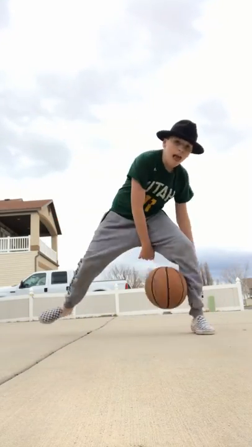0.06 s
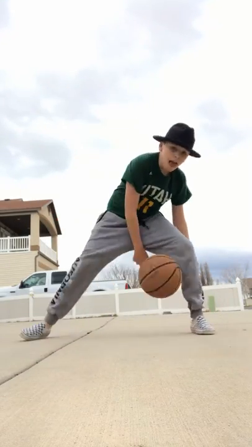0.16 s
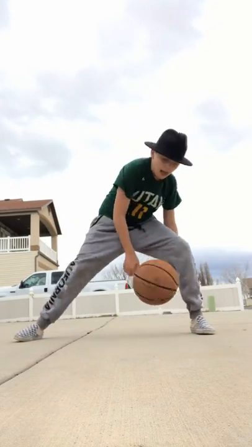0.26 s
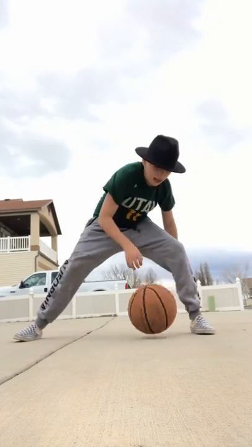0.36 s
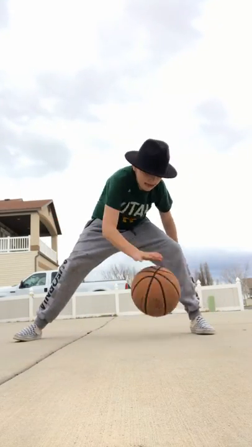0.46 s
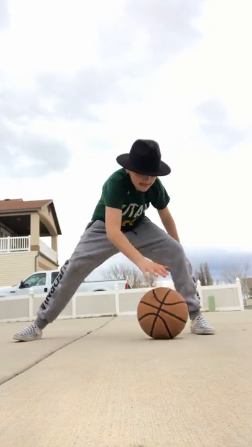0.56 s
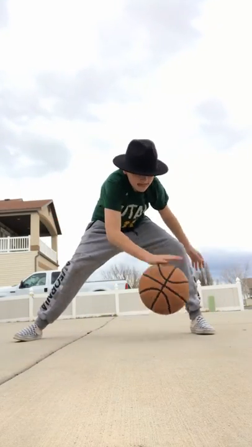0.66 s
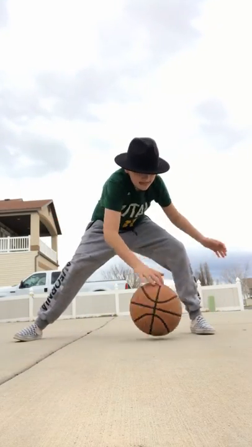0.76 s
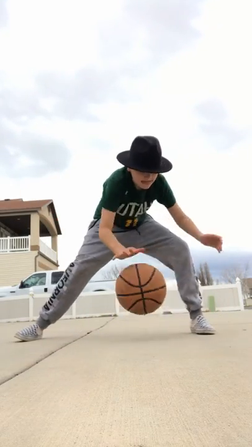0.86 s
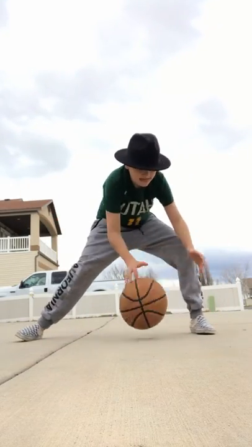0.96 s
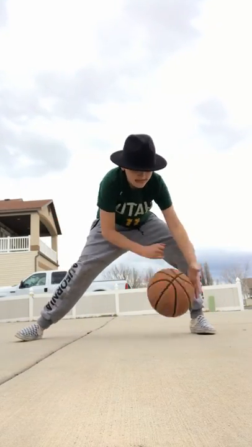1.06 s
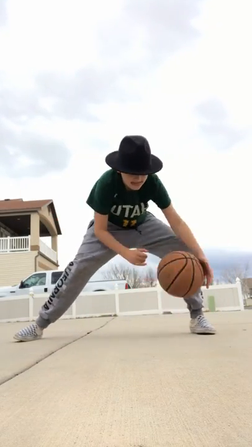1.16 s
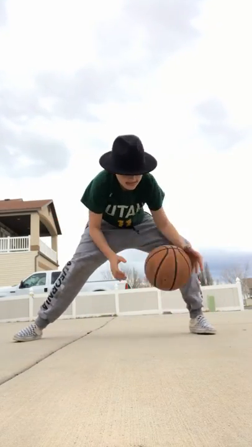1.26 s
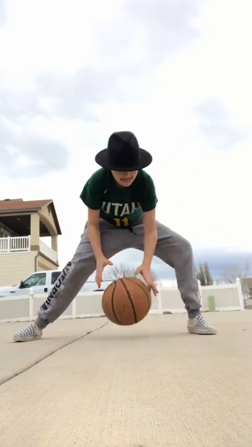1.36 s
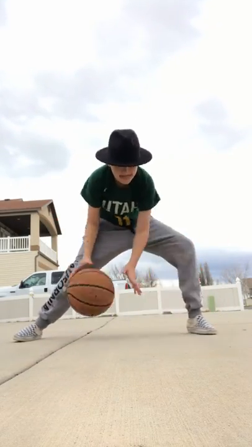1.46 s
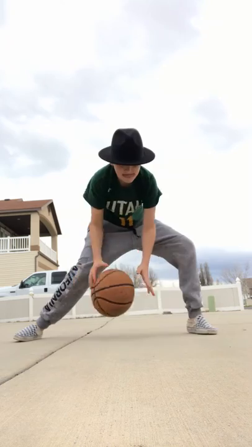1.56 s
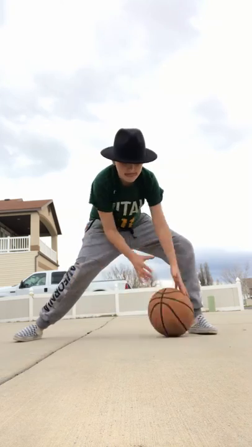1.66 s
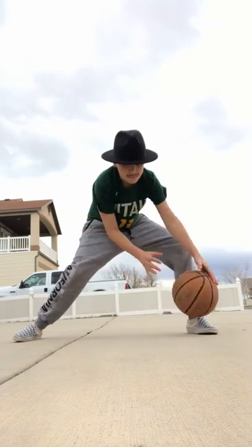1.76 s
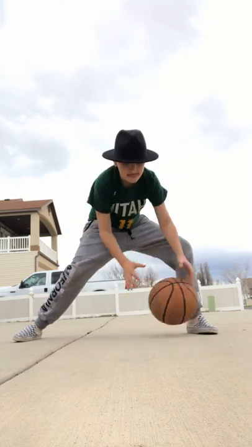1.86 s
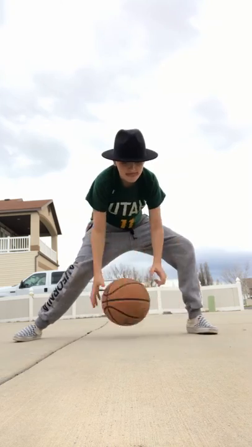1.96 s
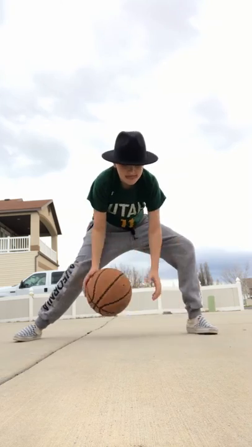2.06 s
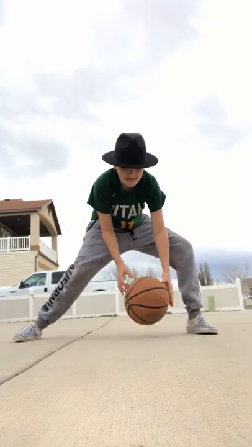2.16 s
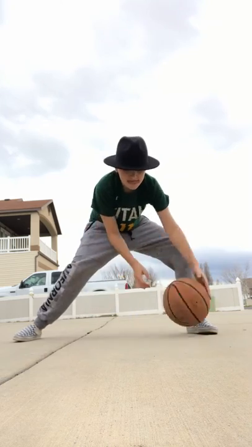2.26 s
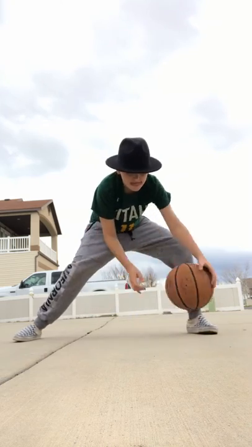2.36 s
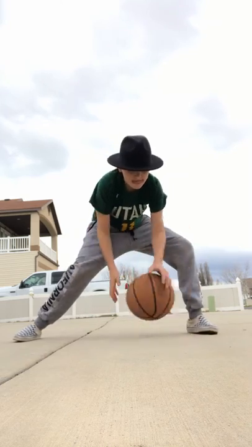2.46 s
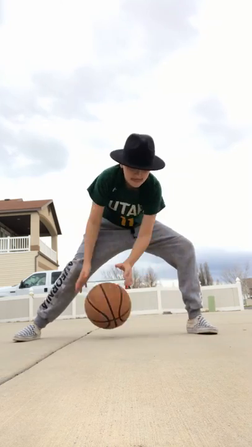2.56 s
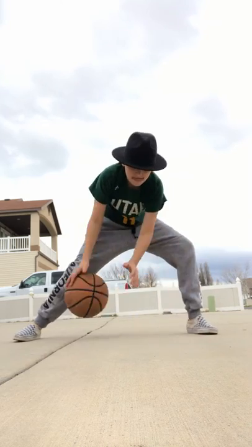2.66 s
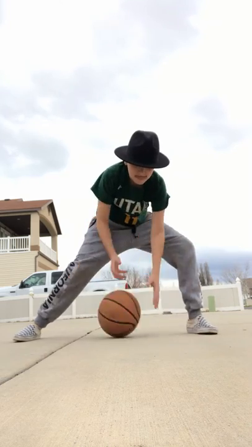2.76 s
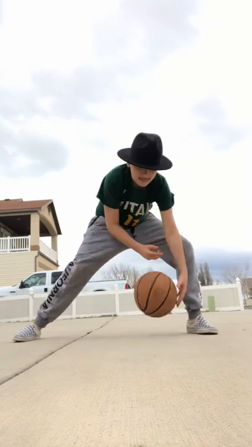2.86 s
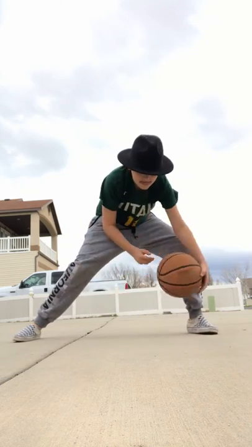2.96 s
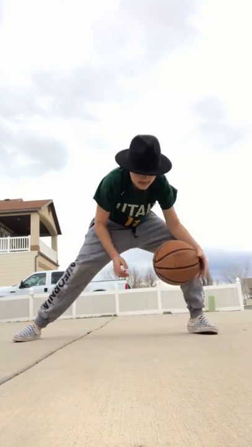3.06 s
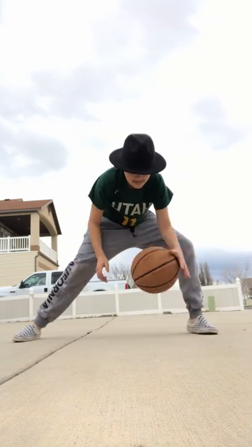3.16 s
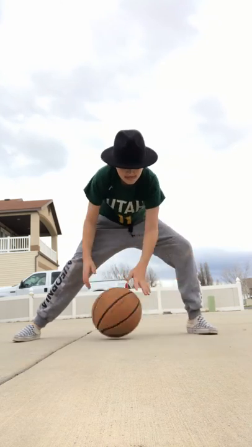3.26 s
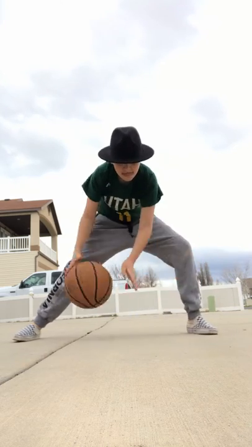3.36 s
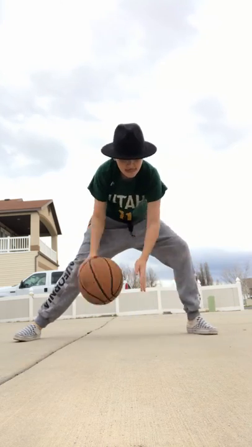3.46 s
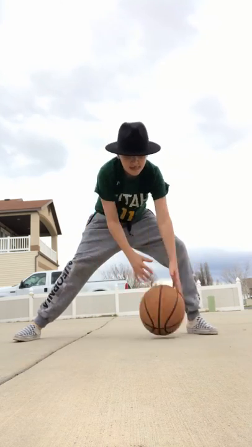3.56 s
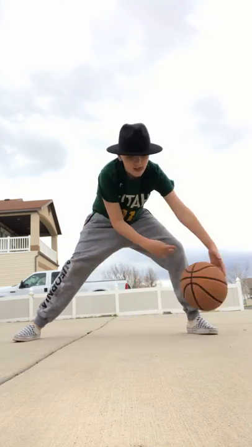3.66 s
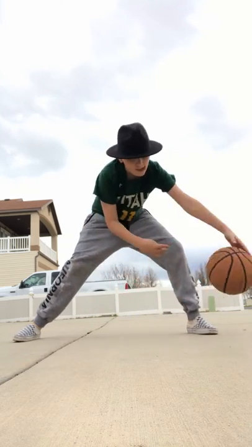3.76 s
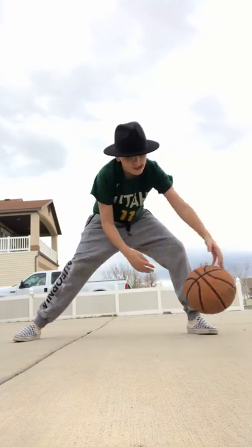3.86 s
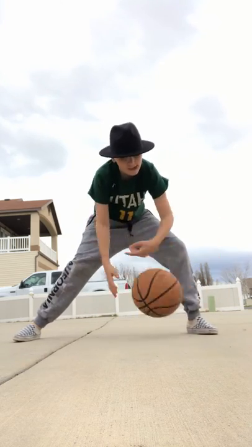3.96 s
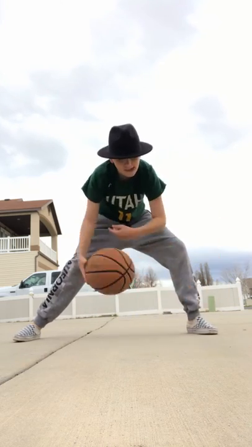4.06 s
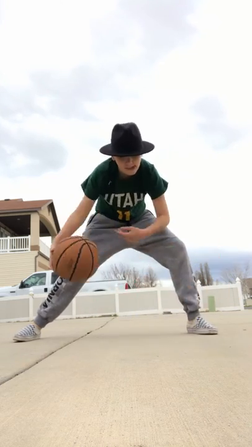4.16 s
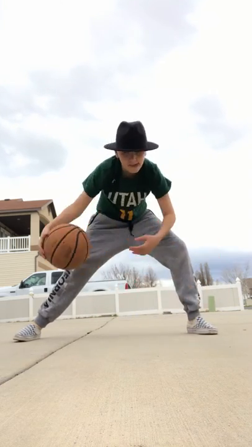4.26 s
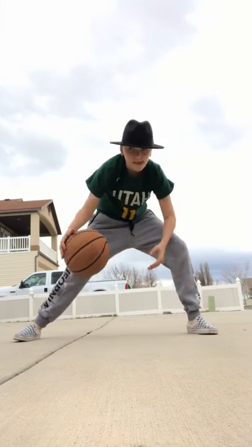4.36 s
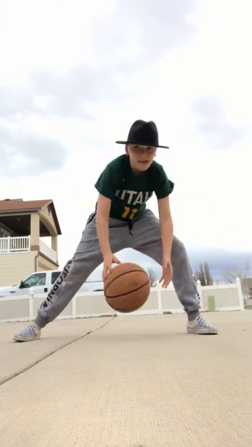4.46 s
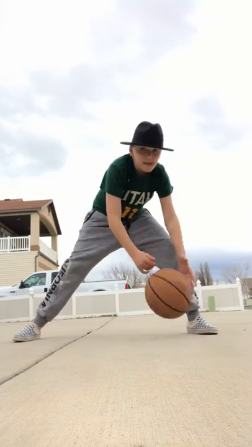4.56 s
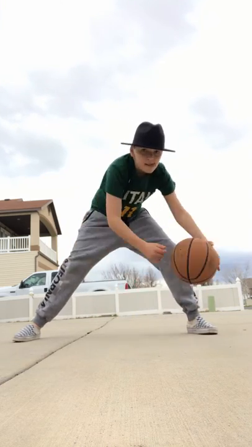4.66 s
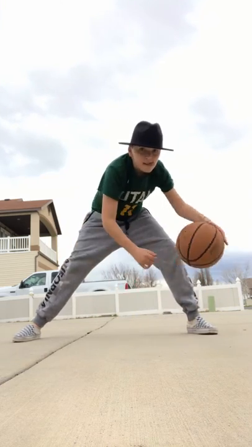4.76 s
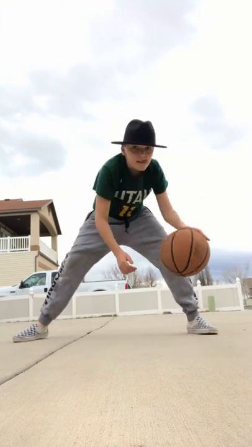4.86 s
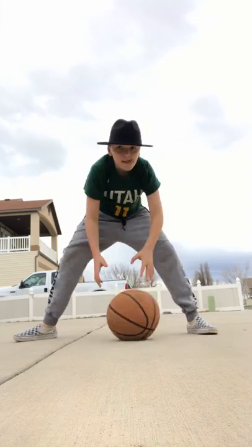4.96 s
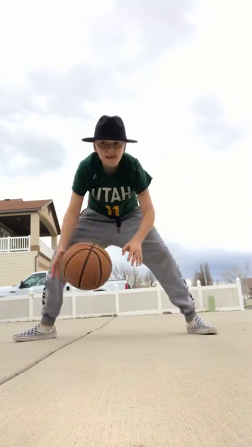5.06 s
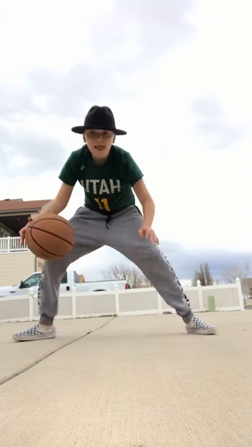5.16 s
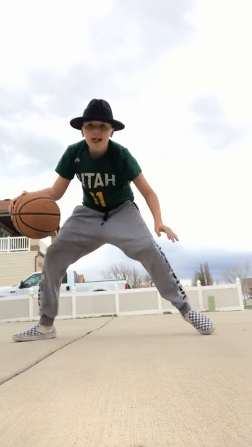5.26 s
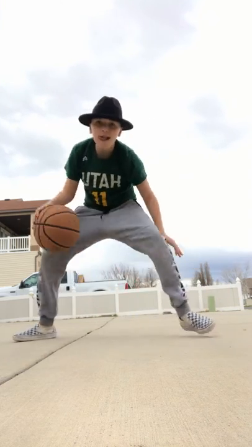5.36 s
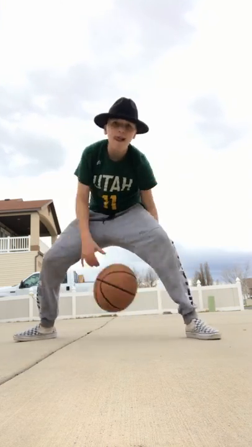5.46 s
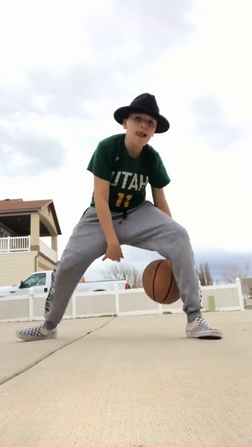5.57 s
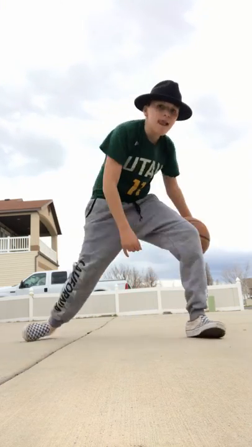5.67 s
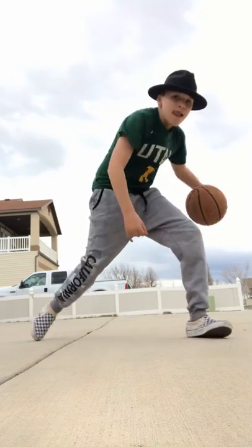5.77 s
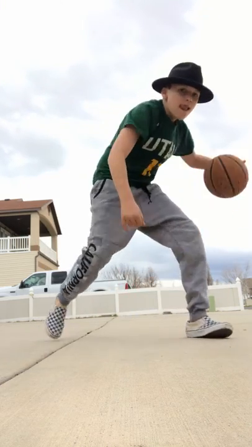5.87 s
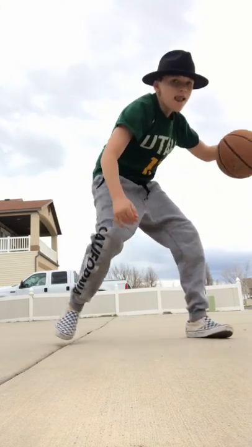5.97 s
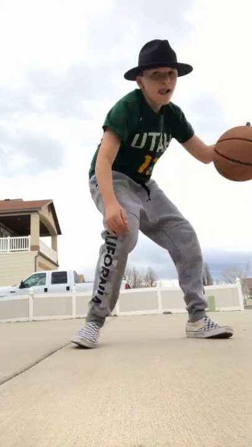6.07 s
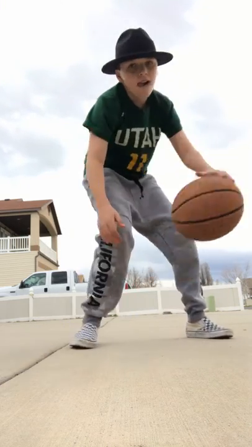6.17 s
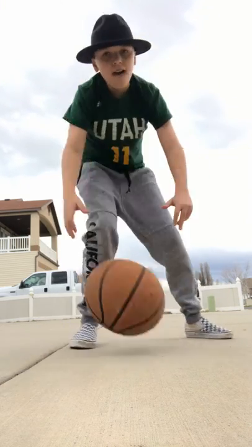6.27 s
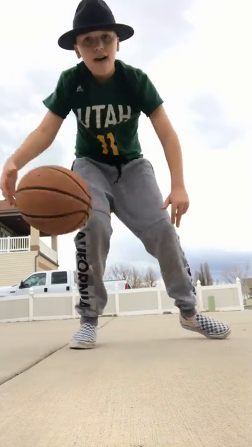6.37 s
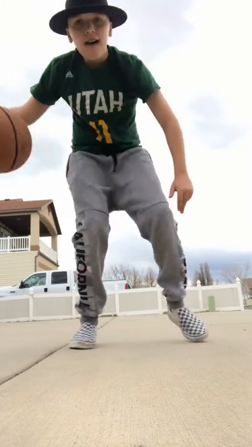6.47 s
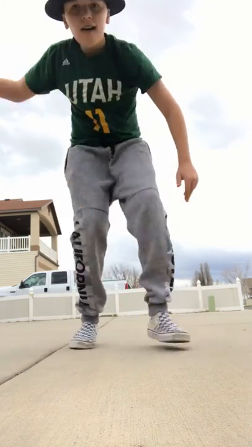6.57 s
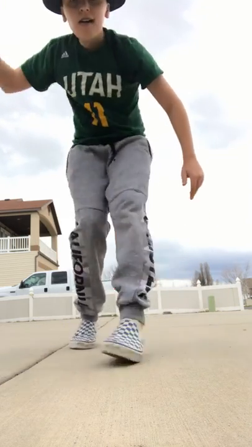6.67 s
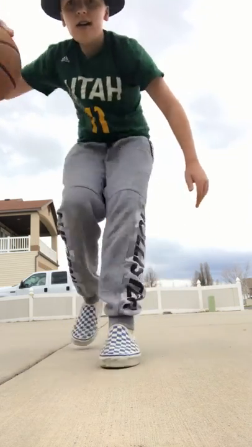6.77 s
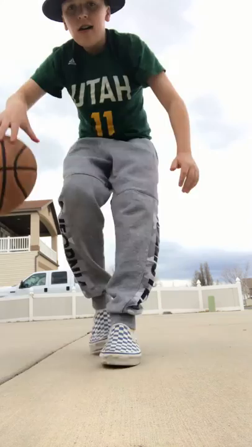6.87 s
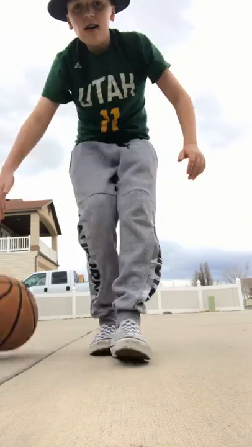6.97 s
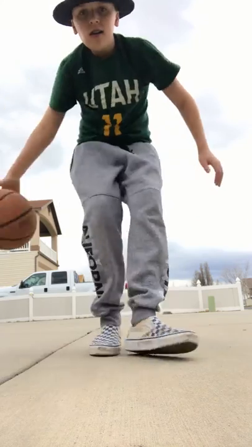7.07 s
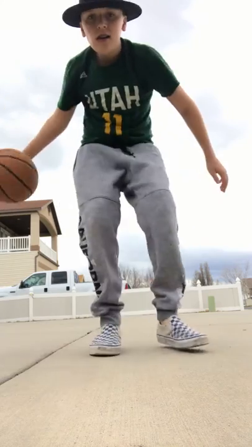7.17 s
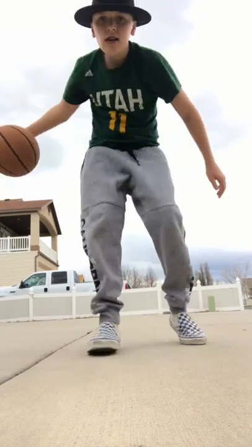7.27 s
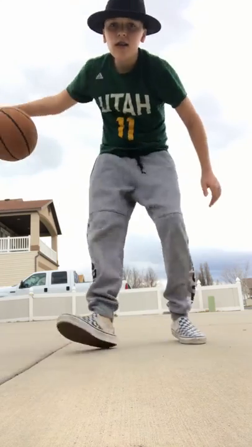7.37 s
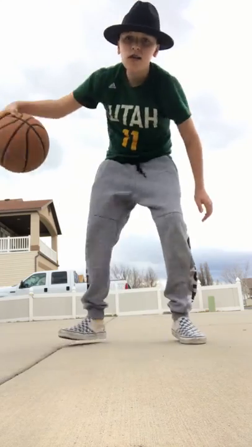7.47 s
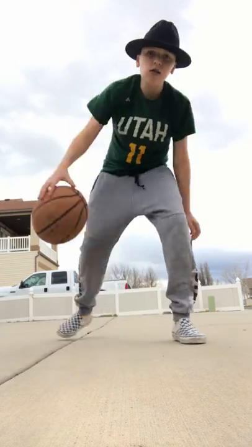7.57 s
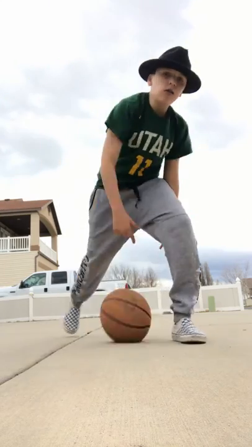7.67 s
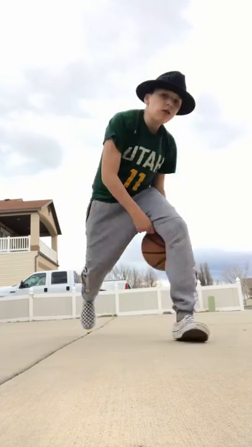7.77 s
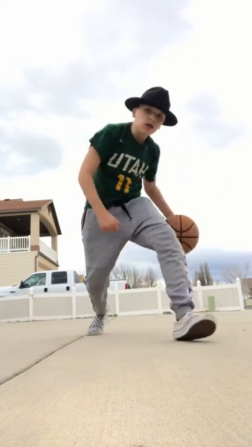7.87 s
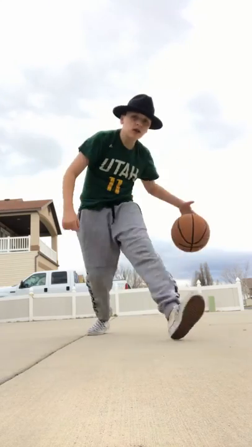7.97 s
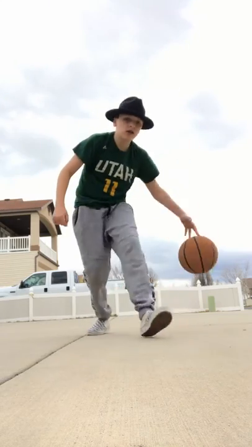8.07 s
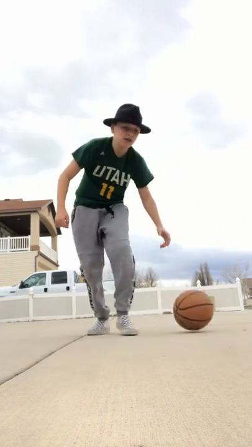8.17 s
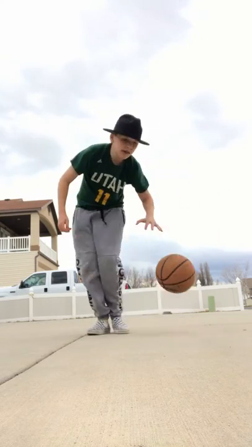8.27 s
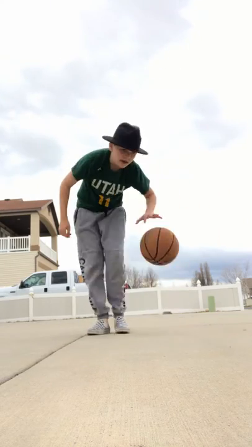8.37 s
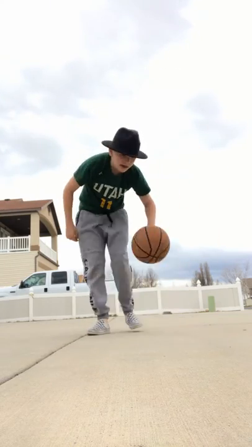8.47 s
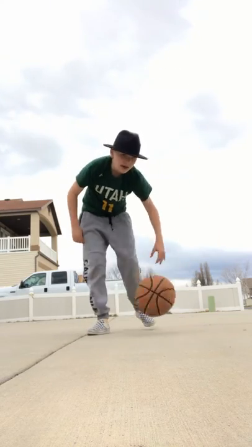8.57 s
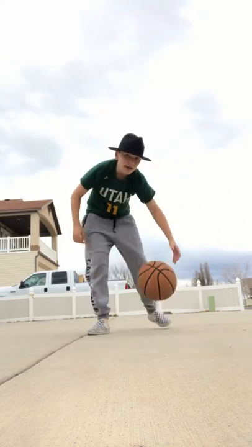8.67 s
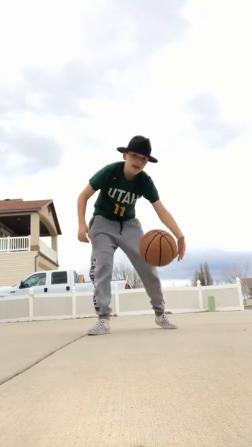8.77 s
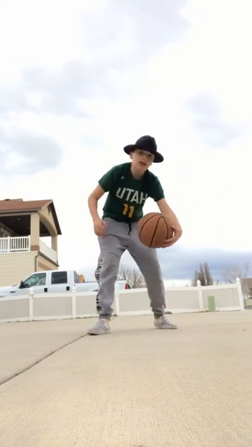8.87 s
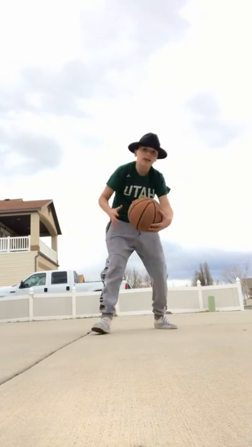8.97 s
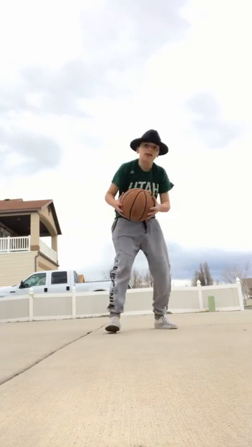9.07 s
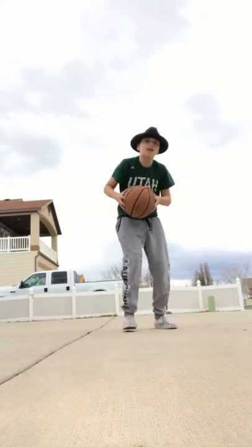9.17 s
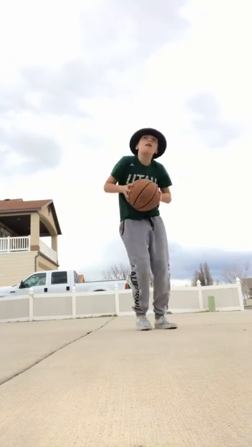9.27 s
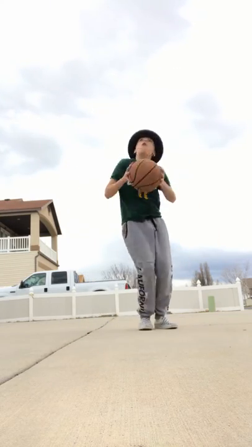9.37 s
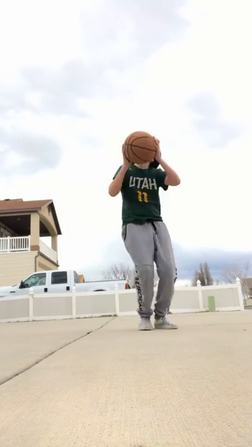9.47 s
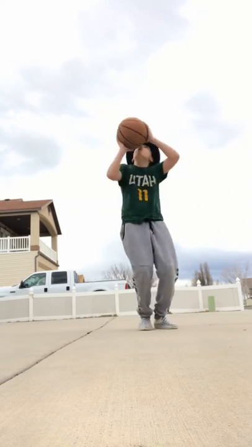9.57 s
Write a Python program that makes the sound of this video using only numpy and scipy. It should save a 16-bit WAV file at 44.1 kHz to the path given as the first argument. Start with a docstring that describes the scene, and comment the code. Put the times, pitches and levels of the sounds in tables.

```python
"""Basketball on a concrete driveway

Each close bounce cracks, thumps and rings faintly with the air inside the ball; walls and fences answer.
Some bounces leave a gritty decay. Hands slap and brush the ball, soles land and scuff on the concrete.
Far traffic rumbles and light wind buffets the microphone."""
import sys
import numpy as np
from scipy import signal
from scipy.fft import rfft, irfft, next_fast_len
from scipy.io import wavfile
from scipy.ndimage import uniform_filter1d, map_coordinates

SR = 44100
rng = np.random.default_rng(int(sys.argv[2]) if len(sys.argv) > 2 else 0)


def output_pcm(signal):
    """Save a mono or channel-first signal as 16-bit PCM at the path in sys.argv[1].

    Samples are clipped to [-1, 1] before scaling.
    """
    pcm = np.clip(np.atleast_2d(signal).T, -1, 1) * 32767
    wavfile.write(sys.argv[1], SR, np.round(pcm).astype(np.int16))


N = 423801
T = np.arange(SR // 2) / SR  # time within one event [s]


def amp(db):
    """dB to gain."""
    return 10 ** (np.asarray(db) / 20)


def unit(x):
    """Scaled to rms 1."""
    return x / np.sqrt(np.mean(x ** 2) + 1e-20)


def along(points, hz):
    """Interpolates (frequency, value) points on a log axis."""
    f, v = np.transpose(points)
    return np.interp(np.log(hz + 1), np.log(f + 1), v)


def curves(rows):
    """One value per sample for each column after the time."""
    s, *cols = np.transpose(rows)
    return [np.interp(np.arange(N) / SR, s, v) for v in cols]


def wobble(rate_hz):
    """Smooth curve through random knots."""
    knots = rng.standard_normal(int(N * rate_hz / SR) + 4)
    return map_coordinates(knots, [np.arange(N) * rate_hz / SR])


def filtered(x, response):
    """Applies a frequency response."""
    m = next_fast_len(len(x) + 8192)
    return irfft(rfft(x, m) * response(np.fft.rfftfreq(m, 1 / SR)), m)[:len(x)]


def noise(spectrum, size=N):
    """Coloured noise of rms 1."""
    return unit(filtered(rng.standard_normal(size), lambda hz: amp(along(spectrum, hz))))


def shaped(x, envelope):
    """Noise under an envelope, scaled to the envelope's energy."""
    return unit(x * envelope) * np.sqrt(np.mean(envelope ** 2))


def ring(hz, t60_s, t, rise_s):
    """Decaying mode that starts at t = 0."""
    t = np.maximum(t, 0)
    return np.sin(2 * np.pi * hz * t) * amp(-60 * t / t60_s) * (1 - np.exp(-t / rise_s))


def add(track, s, sound):
    """Mixes a sound into the track at time s."""
    part = track[round(s * SR):][:len(sound)]
    part += sound[:len(part)]


# traffic: (time [s], drone [dB], tyre roar [dB])
TRAFFIC_LEVELS = [(0, -57.5, -79), (.5, -61.5, -52), (1.2, -62, -54.5), (2.03, -61, -48), (3.6, -61.5, -59),
                  (4.5, -62, -66), (5.6, -60.5, -71), (6.3, -62, -95), (6.9, -61.5, -64.5),
                  (8.6, -62, -55.5), (9.61, -64, -76)]
# drone and tyre spectra: (frequency [Hz], density [dB])
DRONE_SPECTRUM = [(15, -41.5), (25, 3.5), (76, 7.5), (159, -4.5), (470, -13.5), (584, -11.5), (726, -17),
                  (1060, -13.5), (1510, -27), (1930, -27), (4860, -42), (6380, -41), (10400, -47.5),
                  (14400, -46), (16500, -53)]
TYRE_SPECTRUM = [(250, -28.5), (400, -5.5), (620, -6.5), (730, -28), (900, -63.5)]
def traffic():
    """Far traffic: a drone that wavers in patches of time and frequency, plus tyre roar."""
    z = signal.stft(noise(DRONE_SPECTRUM), nperseg=1024)[2]
    patches = uniform_filter1d(uniform_filter1d(rng.standard_normal(z.shape), 8, 0), 8, 1)
    drone = unit(signal.istft(z * amp(1.7 * unit(patches)), nperseg=1024)[1][:N])
    drone_db, tyre_db = curves(TRAFFIC_LEVELS)
    return amp(drone_db + 14.5) * drone + amp(tyre_db - 5.5) * noise(TYRE_SPECTRUM)


# gusts: (peak time [s], level [dB], length [s])
WIND_GUSTS = [(1.093, -32, 0.04), (1.475, -41, 0.06), (1.56, -37, 0.1), (1.635, -28, 0.051),
              (1.7, -33.5, 0.097), (1.783, -42, 0.039), (1.882, -41, 0.046), (1.955, -34, 0.1),
              (2.11, -48, 0.35), (2.267, -42.5, 0.14), (2.38, -48, 0.046), (2.51, -44, .04),
              (2.695, -32, .1), (2.817, -22.5, 0.051), (2.873, -26.5, 0.034), (5.01, -45, .06),
              (5.084, -33, 0.076), (5.163, -27, 0.033), (5.225, -36, 0.1), (5.391, -36.5, 0.068),
              (5.49, -38, 0.16), (5.57, -37.5, 0.093), (5.704, -36.5, 0.099)]
# eddy spectrum: (frequency [Hz], density [dB])
EDDY_SPECTRUM = [(15, -35), (25, -3), (70, 11.5), (103, 0), (129, 1), (224, -9.5), (500, -27.5), (650, -36),
                 (1100, -120)]
def wind():
    """Eddies buffet the microphone in bell-shaped gusts."""
    strength = np.zeros(N)
    for s, db, length_s in WIND_GUSTS:
        add(strength, s - length_s, amp(db) * np.exp(-8 * (T / length_s - 1) ** 2))
    eddies = noise(EDDY_SPECTRUM)
    power = np.abs(uniform_filter1d(eddies ** 2, size=1300))
    return strength * unit(eddies / np.sqrt(power + 0.28))  # evened out so the gust sets the level


# wall and fence reflections: (delay [s], level [dB])
WALL_ECHOES = [(.011, -12), (.044, -37), (.068, -23), (.071, -26), (0.115, -33)]
# street scatter: (frequency [Hz], t60 [s])
STREET_DECAY = [(200, 0.3), (2000, 0.32), (10000, 0.087)]
def reflections(x):
    """Dulled echoes off walls and fences over a thin scattered tail."""
    echoes = sum(amp(db) * np.pad(x, (round(delay_s * SR), 0))[:N] for delay_s, db in WALL_ECHOES)
    hz, t, z = signal.stft(rng.standard_normal(SR // 2), SR, nperseg=256)
    tail = signal.istft(z * amp(-60 * t / along(STREET_DECAY, hz)[:, None]), SR, nperseg=256)[1]
    scattered = signal.fftconvolve(x, tail / np.linalg.norm(tail))[:N]
    return filtered(echoes, lambda hz: 1 / (1 + 1j * hz / 4000) ** 2) + amp(-21.5) * scattered


def strokes(rows, spectra, rise_s, fall_s, fade_db=-1):
    """Bands of grainy noise under one envelope per stroke."""
    envelopes = np.zeros((len(spectra), N))
    for s, length_s, *bands_db in rows:
        edges = np.clip(T / rise_s, 0, 1) * np.clip((length_s - T) / fall_s + .5, 0, 1)
        stroke = edges * amp(fade_db * (T / length_s - 1.5))
        for envelope, db in zip(envelopes, bands_db):
            add(envelope, s, amp(db) * stroke)
    grain = unit(amp(2.5 * wobble(500) + 1.5 * wobble(35)))
    return grain * sum(envelope * noise(band) for envelope, band in zip(envelopes, spectra))


# brushes on the ball: (time [s], length [s], level [dB])
HAND_SWISHES = [(1.074, 0.073, -76), (1.605, 0.033, -65), (1.665, 0.093, -77.5), (1.983, 0.026, -58.5),
                (2.15, 0.054, -73), (2.22, 0.075, -77), (2.612, 0.039, -67), (2.864, 0.045, -71),
                (3.175, 0.054, -77.5), (3.515, 0.036, -67.5), (3.618, 0.13, -75), (4.051, 0.12, -67.5),
                (4.595, 0.13, -77.5), (5.102, 0.13, -71), (6.419, 0.094, -71.5), (6.514, 0.12, -78),
                (8.785, 0.015, -64)]
# brush and airy top spectra: (frequency [Hz], density [dB])
BRUSH_SPECTRUM = [(3500, -23), (5000, -9), (6800, -6), (9000, -5.5), (10500, -17), (12000, -36)]
AIRY_SPECTRUM = [(8500, -41), (10500, -7), (14000, -5), (15800, -8), (16500, -39)]
def swishes():
    """Fingers and cloth brush the ball in soft swells."""
    rows = [(s, length_s, db, db - 1) for s, length_s, db in HAND_SWISHES]
    return strokes(rows, (BRUSH_SPECTRUM, AIRY_SPECTRUM), rise_s=0.0072, fall_s=0.04)


# shoe scuffs and bounce tails: (time [s], length [s], hiss [dB], grit [dB])
GRITTY_SCRAPES = [(0.005, 0.078, -73.5, -62.5), (0.172, 0.039, -57.5, -55), (0.493, 0.022, -67, -67),
                  (0.928, 0.013, -60, -64), (5.377, 0.023, -59.5, -54), (5.64, 0.12, -73, -62.5),
                  (6.004, 0.054, -50.5, -52.5), (6.291, 0.14, -74, -67), (6.618, 0.064, -58, -53.5),
                  (6.861, 0.04, -65, -58), (6.927, 0.035, -67, -58.5), (6.98, 0.07, -62.5, -55),
                  (7.064, 0.26, -83, -73), (7.224, 0.042, -53, -55.5), (7.27, 0.099, -68, -63.5),
                  (7.562, 0.2, -76, -71.5), (7.742, 0.084, -71, -63.5), (7.868, 0.086, -74, -69),
                  (7.988, 0.037, -45, -44.5), (8.168, 0.071, -54, -46.5), (8.233, 0.088, -78, -64.5),
                  (8.617, 0.061, -67, -64.5), (8.983, 0.076, -74.5, -70), (9.247, 0.046, -68, -65.5)]
# hiss and grit spectra: (frequency [Hz], density [dB])
HISS_SPECTRUM = [(3500, -41), (5200, 1.5), (6500, 2.5), (9000, -4.5), (13000, -11), (15500, -19),
                 (16500, -37)]
GRIT_SPECTRUM = [(400, -7.5), (1100, 2), (1500, -10.5), (2400, -1.5), (4500, -7), (6500, -26),
                 (9000, -45.5)]
def scrapes():
    """Shoe scuffs and the gritty decay after ball bounces on concrete."""
    return strokes(GRITTY_SCRAPES, (HISS_SPECTRUM, GRIT_SPECTRUM), rise_s=0.0053, fall_s=0.019)


# thud spectrum: (frequency [Hz], density [dB])
THUD_SPECTRUM = [(70, -24), (130, -6), (350, -1), (580, -1), (800, -11), (1200, -11), (1500, -40),
                 (3000, -49.5)]
def thud(db, t60_s):
    """Dull, fast-dying noise of a landing."""
    t = T[:SR // 5]
    envelope = amp(db - 60 * t / t60_s) * (1 - np.exp(-t / 0.00022))
    return shaped(noise(THUD_SPECTRUM, len(t)), envelope)


# crack spectrum: (frequency [Hz], density [dB])
CRACK_SPECTRUM = [(700, -17.5), (1200, 9.5), (1500, -9), (2000, 10), (3000, 1), (4200, -2), (4900, -6),
                  (6800, -2.5), (7800, -15), (9200, -10.5), (12000, -18.5), (14000, -11.5), (15800, -30),
                  (16800, -33.5)]
def crack(mid_db, treble_db, t60_s, rise_s):
    """Air squeezed from the contact patch: a short noise whose treble dies first."""
    t = T[:SR // 10]
    air = noise(CRACK_SPECTRUM, len(t))
    treble = filtered(air, lambda hz: 1 / (1 + (5000 / (hz + 1)) ** 6))
    onset = 1 - np.exp(-t / rise_s)
    return (shaped(air - treble, onset * amp(mid_db - 60 * t / t60_s))
            + shaped(treble, onset * amp(treble_db - 60 * t / (.75 * t60_s))))


# sole and fingertip landings: (time [s], click [dB], pat [dB])
LANDINGS = [(0.1725, -33, -34.5), (0.1953, -51, -47), (1.143, -47.5, -60), (1.611, -38.5, -48),
            (1.9898, -39.5, -37), (5.1307, -42, -45.5), (5.3809, -39, -33.5), (5.4004, -41, -40.5),
            (6.006, -48, -42), (6.0404, -33.5, -36), (6.678, -48.5, -25), (6.8727, -32.5, -34),
            (7.494, -40.5, -67), (7.7987, -54, -38), (7.878, -48, -62), (8.315, -53, -62),
            (8.4036, -45, -47.5), (9.302, -41.5, -43)]
def pats():
    """Soles and fingertips land with a small click, a damped tone and a thud."""
    out = np.zeros(N)
    for s, click_db, pat_db in LANDINGS:
        add(out, s, 0.96 * crack(click_db, click_db - 8.5, t60_s=0.0067, rise_s=0.0005))
        hz = 557 + 1.5 * (pat_db + 41)  # firmer landings sound higher
        add(out, s, 2.2 * amp(pat_db) * ring(hz, .02, T[:SR // 5], rise_s=.001))
        add(out, s, thud(pat_db - 2, t60_s=.035))
    return out


# air modes in the ball: (frequency [Hz], level [dB], t60 [s])
AIR_MODES = [(1427, -10, .2), (1674, -10, .2), (2105, 4, .28), (2654, 6, .27), (3149, -2, .38),
             (3413, -8, .9), (3655, -7, .5), (4285, -10, .7)]
def cavity(tilt_db_per_oct):
    """The enclosed air rings, with new mode strengths at every blow."""
    return sum(amp(db + tilt_db_per_oct * np.log2(hz / 2400) + rng.normal(0, 3.5))
               * ring(hz, t60_s, T, rise_s=0.00077) for hz, db, t60_s in AIR_MODES)


# slaps: (time [s], smack [dB], treble [dB], hollow [dB], ring re smack [dB], smack t60 [s], palm lag [s])
HAND_SLAPS = [(0.4867, -39, -32, -20.5, -23, 0.025, 0.0044),
              (0.6761, -47.5, -43, -25.5, -26, 0.042, 0.0088), (0.915, -43, -34.5, -27, -33, 0.02, 0.0017)]
# shell modes under a flat palm: (frequency [Hz], level [dB], t60 [s])
PALM_MODES = [(250, -4, .03), (350, -1, .04), (455, -1, .075), (600, -3, .035), (960, -3, .025)]
def slaps():
    """Fingers smack the ball and ring its air; the palm follows with a hollow thud."""
    sharp, deep = np.zeros((2, N))
    for s, smack_db, treble_db, hollow_db, ring_db, smack_t60_s, lag_s in HAND_SLAPS:
        add(sharp, s, 1.54 * crack(smack_db, treble_db, smack_t60_s, rise_s=0.0015))
        add(sharp, s, amp(smack_db + ring_db) * cavity(tilt_db_per_oct=-15))
        shell = sum(amp(db) * ring(hz, t60_s, T - lag_s, rise_s=0.00054) for hz, db, t60_s in PALM_MODES)
        add(deep, s, 0.71 * amp(hollow_db) * shell)
        add(deep, s + lag_s, thud(hollow_db - 5, t60_s=0.038))
    return sharp, deep


# bounces: (time [s], crack [dB], treble [dB], thump [dB], shell [dB], hollow [dB], ring [dB])
BALL_BOUNCES = [(0.0, -40, -44, -26.5, -43, -45.5, -64.5), (0.386, -25, -38.5, -30.5, -32, -42, -73),
                (0.5717, -29, -27.5, -34, -22, -46, -72), (0.755, -26, -26, -27, -38, -34.5, -69.5),
                (0.9999, -24.5, -31.5, -27.5, -27, -36, -72),
                (1.4071, -22.5, -29.5, -24.5, -29.5, -40, -63.5), (1.6417, -27.5, -29, -34, -40, -46, -78),
                (1.8922, -31, -34, -31, -42, -45, -71), (2.1993, -30, -31.5, -34.5, -39, -45, -76),
                (2.5133, -29, -32, -30.5, -43.5, -45, -75), (2.7604, -36, -26.5, -25.5, -46, -38.5, -72),
                (3.2638, -23.5, -24, -24, -27, -35, -66), (3.5605, -29.5, -30.5, -29, -33.5, -35.5, -67.5),
                (3.8948, -27.5, -27.5, -27.5, -30, -35.5, -69), (4.5053, -24, -29, -23.5, -26, -34.5, -71),
                (4.9561, -18.5, -25, -21.5, -25, -31.5, -64), (5.4951, -14, -17.5, -21.5, -21, -31, -61),
                (6.2354, -11, -17.5, -16.5, -13.5, -27, -53.5),
                (6.9591, -11.5, -18.5, -16, -23, -20.5, -53), (7.6558, -12.5, -15, -18, -19.5, -35, -60),
                (8.1605, -17.5, -22.5, -26, -19.5, -31, -61), (8.5866, -19, -24, -22, -17.5, -32, -68)]
# thump, punch, shell, hollow, knock modes: (frequency [Hz], t60 [s], rise [s], extra lag [s], sign)
BODY_MODES = [(86, .06, .002, .002, -1), (122, .045, .0015, .0018, -1), (232, .03, .0006, 0, 1),
              (435, .045, .004, .0005, 1), (1020, .022, .0005, -.002, 1)]
def bounces():
    """The ball cracks at first touch on concrete, then thumps as it flattens and springs back."""
    flatten_s, usual_db = 0.003005, -25
    sharp, deep = np.zeros((2, N))
    t = T[:SR // 5] - flatten_s
    for s, crack_db, treble_db, thump_db, shell_db, hollow_db, ring_db in BALL_BOUNCES:
        add(sharp, s, 0.9 * crack(crack_db, treble_db, t60_s=0.013, rise_s=0.0001))
        add(sharp, s, amp(ring_db) * cavity(tilt_db_per_oct=-4))
        punch_db = -27.5 + 1.6 * (thump_db - usual_db)
        knock_db = -42 + 1.365 * (crack_db - usual_db)
        modes_db = (thump_db, punch_db, shell_db, hollow_db, knock_db)
        for (hz, t60_s, rise_s, lag_s, sign), db in zip(BODY_MODES, modes_db):
            detuned_hz = hz * rng.normal(1, .05)
            add(deep, s, 3.52 * sign * amp(db) * ring(detuned_hz, t60_s, t - lag_s, rise_s))
        add(deep, s, thud(thump_db - 6.5, t60_s=0.038))
    return sharp, deep


def scene():
    """Ball, hands and feet up close, their echoes, traffic and wind."""
    sharp, deep = np.add(bounces(), slaps())
    sharp += pats()
    echoes = reflections(sharp + amp(-1) * deep)
    return (sharp + deep + echoes + scrapes() + swishes() + traffic() + wind())[None]


def record(dry):
    """The microphone rolls off the deepest bass and cuts everything above its band limit."""
    bass_hz, top_hz = 36, 17000
    return filtered(dry[0], lambda hz: (1j * hz / (bass_hz + 1j * hz)) ** 3 * (hz < top_hz))[None]


dry = scene()
out = record(dry)
output_pcm(out)
```